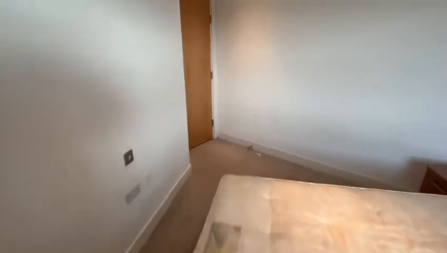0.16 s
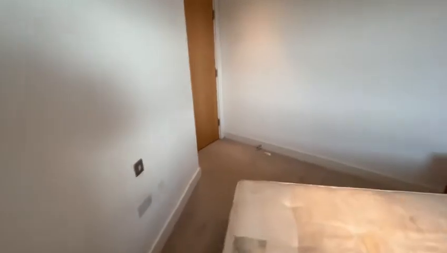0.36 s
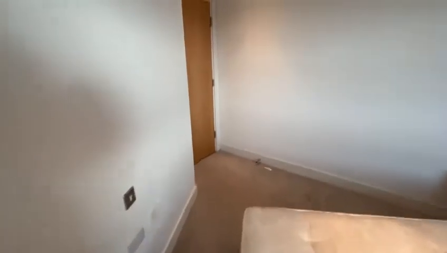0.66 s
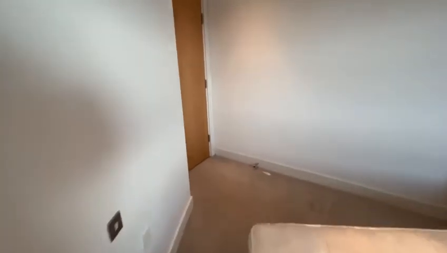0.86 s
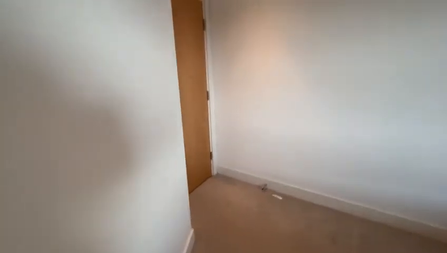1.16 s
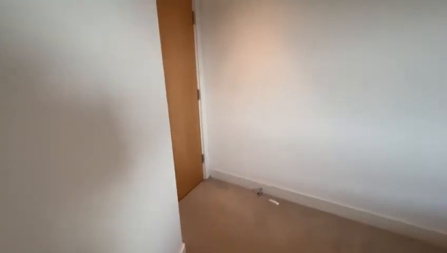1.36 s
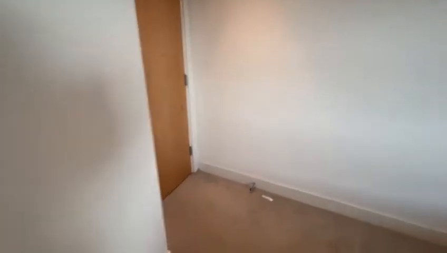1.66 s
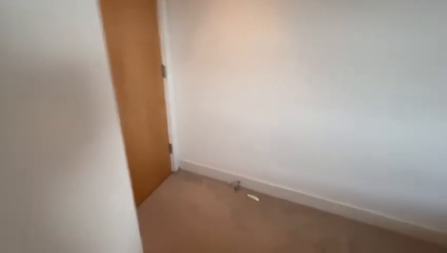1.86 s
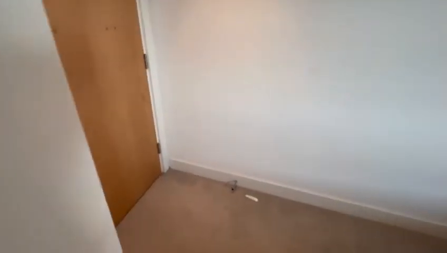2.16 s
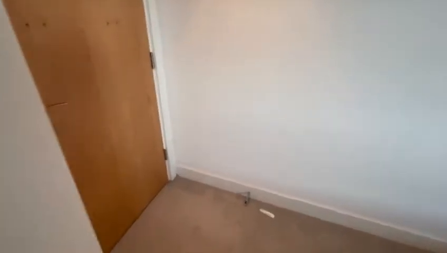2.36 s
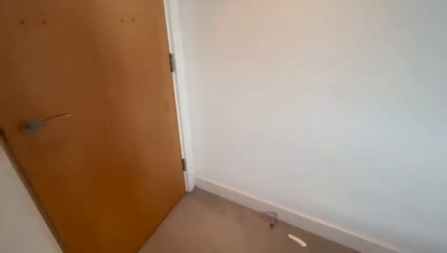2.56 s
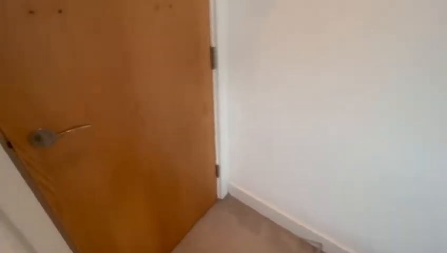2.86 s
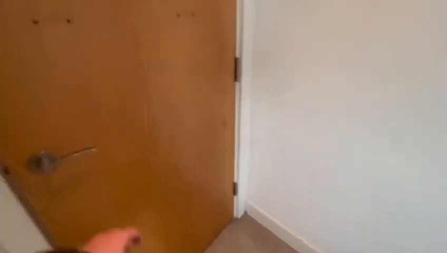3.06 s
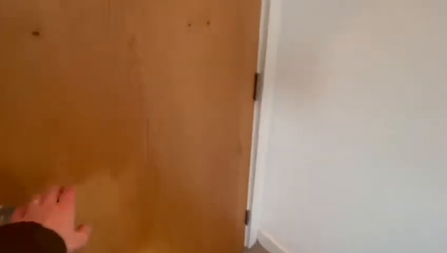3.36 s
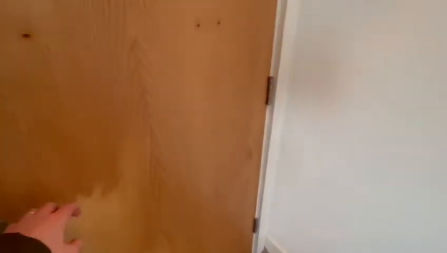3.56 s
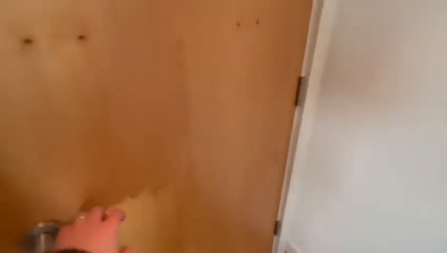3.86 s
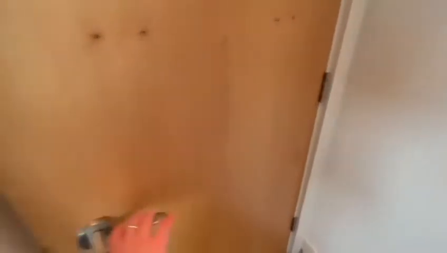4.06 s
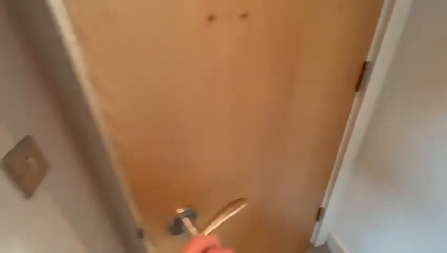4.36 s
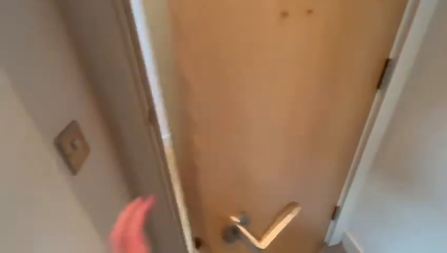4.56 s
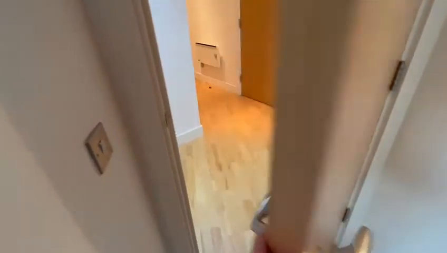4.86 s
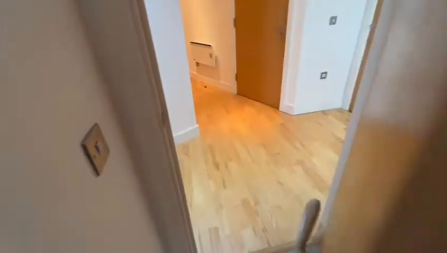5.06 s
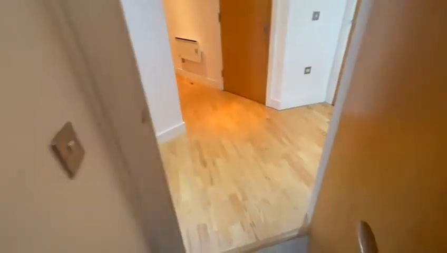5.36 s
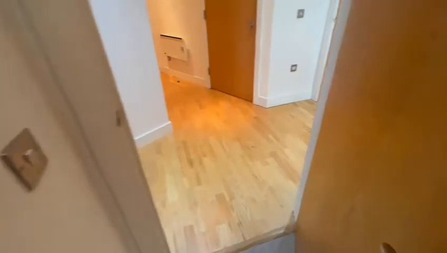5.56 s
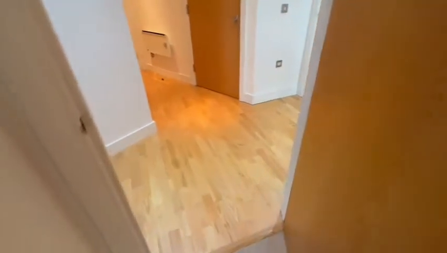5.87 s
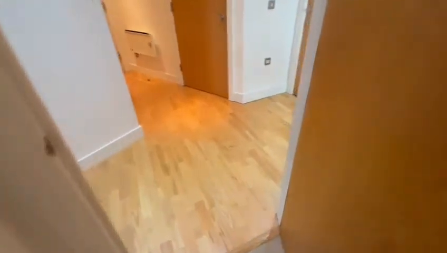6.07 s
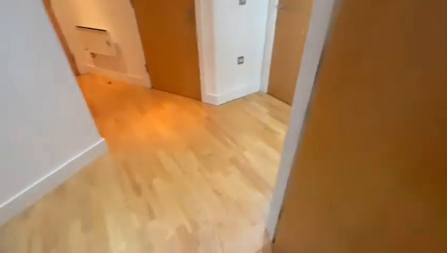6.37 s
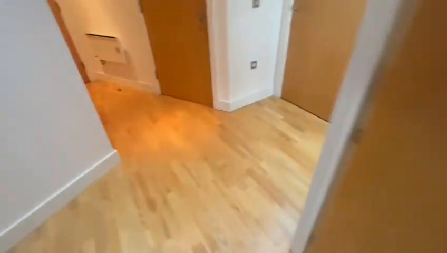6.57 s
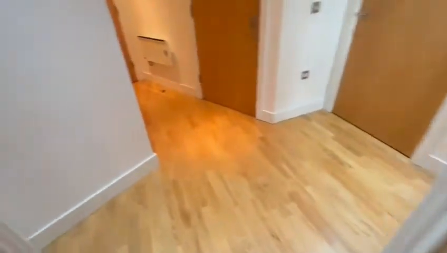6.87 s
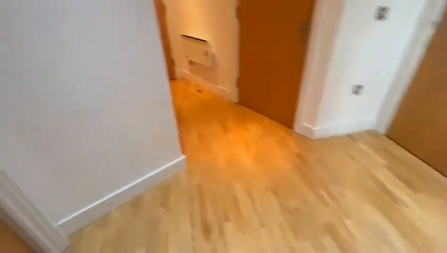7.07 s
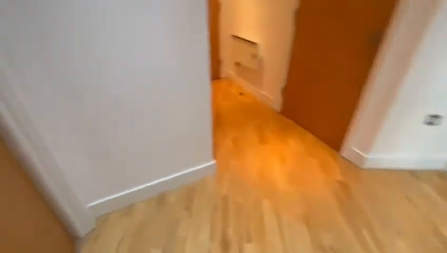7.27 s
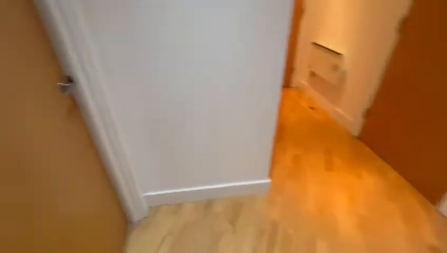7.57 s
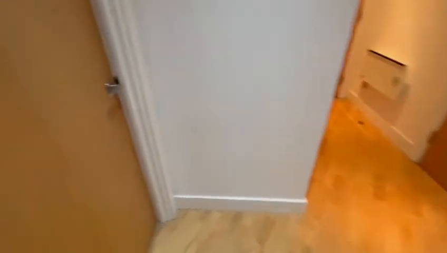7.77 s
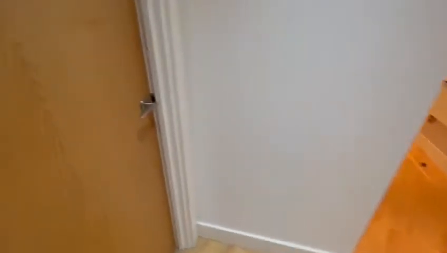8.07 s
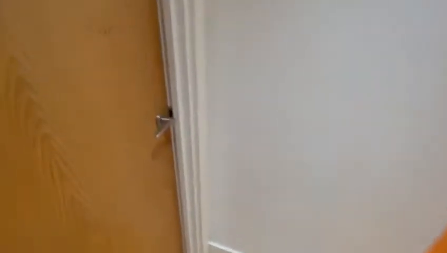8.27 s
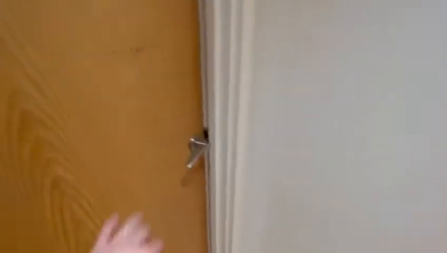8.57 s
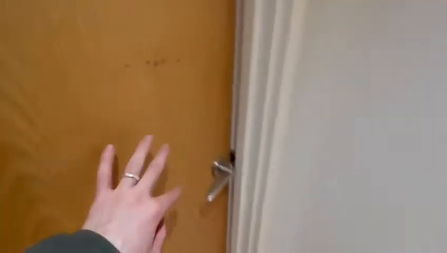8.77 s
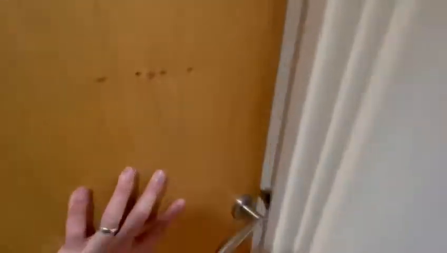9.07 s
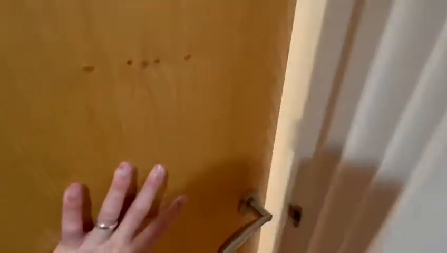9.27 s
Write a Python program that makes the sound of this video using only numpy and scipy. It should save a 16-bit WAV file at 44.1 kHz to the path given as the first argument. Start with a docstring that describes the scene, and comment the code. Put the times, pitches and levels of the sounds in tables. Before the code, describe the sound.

A hand-held mono microphone in an empty, bare-walled flat, with faint hiss and soft low bumps of fingers on its case. From 0 to 1 s, quiet carpet scuffs, small ticks and cloth rustle. At about 1.05 s a swish swells into a bright, sharp metallic click, with a low footfall. Quieter shuffles and small ticks follow, with dull wood taps near 2.6 s. At 3.1-3.5 s a brief falling squeaky rub, with handle knocks at 3.25 and 3.4 s. From 3.8 to 4.2 s a deep throb as the door pulls free, a click and tap at 4.27 s, then soft rustling. At 6.2 s a hollow wooden thud and click. Around 7.15-7.4 s a loud gritty drag on resonant parquet, another at 7.9-8.4 s. At 8.8-9.05 s knocks and crisp latch clacks, then a soft low push at 9.25 s and faint taps.

```python
"""An empty flat with bare walls: someone walks over carpet, works a lever handle, pulls a wooden door open,
steps onto a parquet hall and pushes a second door, heard by a hand-held single microphone.
Soles and clothes are coloured noise with catches, and parquet strips resonate; the floor is low noise.
Latches are noise bursts with steel modes, knocks are wood modes, the door's boom is a gliding sine.
Fingers on the case are falling chirps; a decaying noise tail gives the echo, steady noise the air."""
import sys
import numpy as np
from scipy import signal
from scipy.fft import rfft, irfft, next_fast_len
from scipy.io import wavfile
from scipy.ndimage import uniform_filter1d, map_coordinates

SR = 44100
rng = np.random.default_rng(int(sys.argv[2]) if len(sys.argv) > 2 else 0)


def inscribe(sig):
    """Save sig as 16-bit PCM at rate SR to the path in sys.argv[1].

    A 1-D sig is mono; a 2-D sig holds one channel per row.
    Samples are clipped to [-1, 1] before scaling.
    """
    pcm = np.round(np.clip(np.atleast_2d(sig).T, -1, 1) * 32767)
    wavfile.write(sys.argv[1], SR, pcm.astype(np.int16))


def boost(x):
    """Linear amplitude factor 10**(x/20) for a level x in decibels (scalar or array-like)."""
    u = np.asarray(x, float) / 20
    return 10 ** u


N = 415422

# Scuffs and drags. Each row: full contact in seconds, swell in seconds, hold in seconds,
# sole scrape level in dB, clothes swish level in dB, scrape resonance in Hz.
STROKE_ROWS = [(0.176, 0.15, 0.014, -55, -51.5, 1200), (0.308, .004, 0.057, -55.5, -56, 1140),
               (0.614, .004, 0.016, -56, -69, 1130), (0.887, .004, 0.0083, -52, -64, 1220),
               (1.05, 0.47, 0.0062, -56, -35.5, 500), (1.051, .004, 0.0027, -36.5, -31, 1390),
               (1.324, 0.12, 0.018, -61, -63, 446), (1.944, .004, 0.49, -56.5, -56, 826),
               (2.51, 0.04, 0.016, -52.5, -55.5, 1250), (2.635, 0.17, 0.017, -76, -59.5, 400),
               (3.06, .004, 0.065, -54, -50, 1200), (3.129, 0.17, 0.18, -52.5, -46.5, 1010),
               (3.692, .004, 0.022, -49, -54, 1500), (3.853, .12, 0.069, -57, -67, 424),
               (4.05, .01, 0.027, -53, -75, 500), (4.274, .003, 0.025, -50.5, -75, 900),
               (4.458, 0.12, 0.012, -56, -58, 600), (4.641, 0.27, 0.11, -55.5, -51.5, 880),
               (4.876, 0.65, 0.24, -64, -54.5, 1060), (5.887, 0.27, 0.38, -57, -52.5, 970),
               (6.192, 0.0044, 0.024, -37, -60, 624), (6.454, 0.36, 0.031, -54.5, -70, 910),
               (6.815, 0.095, 0.014, -59.5, -65, 500), (6.985, .01, 0.032, -62.5, -63, 1130),
               (7.166, 0.077, .03, -45.5, -40.5, 1160), (7.212, 0.23, 0.054, -34, -38, 1320),
               (7.266, 0.078, 0.14, -29, -35.5, 1320), (7.492, .004, 0.11, -52, -57, 1540),
               (7.923, 0.066, 0.071, -34.5, -39, 920), (8.003, 0.17, 0.1, -33.5, -45, 700),
               (8.08, .004, 0.0076, -33, -34, 855), (8.15, 0.34, 0.17, -32, -40.5, 910),
               (8.801, .004, 0.022, -43, -42, 500), (8.904, .004, 0.0053, -33.5, -52, 390),
               (9.038, .002, 0.013, -43, -41, 1240)]
# Background rustle level between strokes, rising and dipping. Each row: time in seconds,
# sole scrape level in dB, clothes swish level in dB.
RUSTLE_ROWS = [(0, -73, -68.5), (.1, -63.5, -61), (.6, -67, -62), (.86, -58.5, -55.5), (1.46, -80, -67.5),
               (1.83, -59.5, -56.5), (2.7, -64.5, -65), (3.04, -56.5, -55), (3.47, -56, -50.5),
               (3.64, -71, -77), (3.8, -63, -69), (4.12, -58, -59.5), (4.25, -65, -72), (4.44, -62.5, -57),
               (5.22, -67, -65), (5.77, -62.5, -60), (6.6, -59.5, -57), (6.7, -69, -66.5), (6.95, -91, -96),
               (7.13, -58, -52), (7.89, -58.5, -59.5), (9.27, -56.5, -62), (9.42, -70, -83)]
# Soles on carpet. Each row: frequency in Hz, relative density in dB per Hz.
SCRAPE_CARPET = [(88, -13), (150, -1), (236, -9.5), (286, -2), (324, 0), (601, -5), (4000, -17.5),
                 (5200, -25), (8800, -120)]
# Soles on parquet. Each row: frequency in Hz, relative density in dB per Hz.
SCRAPE_PARQUET = [(100, -34), (170, -14), (300, -2.5), (560, -6), (900, -7), (1590, -6), (4000, -12),
                  (5200, -12), (8800, -120)]
# Clothes near carpet. Each row: frequency in Hz, relative density in dB per Hz.
SWISH_CARPET = [(1060, -6), (1800, -4.5), (3150, -8), (4890, -8), (5420, -6.5), (9190, -13), (11100, -22.5),
                (12200, -26.5), (15800, -68)]
# Clothes over parquet. Each row: frequency in Hz, relative density in dB per Hz.
SWISH_PARQUET = [(1060, -23), (1800, -5), (2100, -5), (3490, -1.5), (5340, -6), (9110, -17), (11200, -21.5),
                 (12200, -27), (15800, -65)]
# Strips singing under the first drag. Each row: frequency in Hz, width in Hz, relative gain in dB.
FIRST_STRIPS = [(270, 21, 4.5), (398, 27, -2.5), (600, 310, -2), (686, 31, -9), (1250, 450, -5.5),
                (1550, 88, -3.5), (1880, 42, -8)]
# Strips under the next step. Each row: frequency in Hz, width in Hz, relative gain in dB.
NEXT_STRIPS = [(261, 21, -4), (303.4, 10.6, 3), (349, 8.6, -1.5), (422, 19, -0.5), (675, 20, -6.5),
               (790, 32, -8), (850, 15, -7.5), (1080, 44, -9.5), (1550, 49, -7.5)]
# A rub singing in a narrow band, with jumps to lower ones. Each row: time in seconds, pitch in Hz, level in dB.
SQUEAK_TRACK = [(3.085, 1332, -47), (3.11, 1327, -39), (3.145, 1238, -36.5), (3.2, 1151, -48.5),
                (3.3, 910, -61), (3.355, 893, -45.5), (3.385, 888, -44), (3.395, 570.4, -52),
                (3.43, 571, -46), (3.49, 561, -56)]
# Weight coming down on the floor. Each row: time in seconds, rumble level in dB, boards level in dB.
STEP_ROWS = [(.06, -77, -79), (.23, -54, -66), (.47, -53, -70), (1.08, -41, -53.5), (1.36, -53, -58),
             (1.969, -52.5, -52), (2.2, -77, -50), (2.56, -59, -60), (3.3, -55, -59), (3.53, -54, -54),
             (3.71, -49, -64), (3.86, -44, -48.5), (4.2, -46.5, -49), (4.87, -46, -59), (5.27, -56, -56),
             (5.55, -51, -85), (5.73, -53.5, -63), (6.26, -43.5, -43.5), (6.55, -56, -72),
             (7.252, -52.5, -51), (7.84, -61, -69), (8.11, -53.5, -44), (8.93, -44.5, -41),
             (9.08, -43, -64), (9.25, -46, -49), (9.36, -56, -55)]
# Floor rumble. Each row: frequency in Hz, relative density in dB per Hz.
RUMBLE_SPECTRUM = [(15, -38), (25, -5), (38, 3), (54, 20.5), (102, 13), (130, -18), (170, -59), (290, -120)]
# Floor boards. Each row: frequency in Hz, relative density in dB per Hz.
BOARDS_SPECTRUM = [(59, -61), (100, -3), (155, 1), (221, -1), (350, -11.5), (460, -13.5), (770, -120)]
# Sharp contacts. Each row: start in seconds, peak level in dB, centre in Hz, burst t60 in seconds,
# relative width as a share of the centre.
CLICK_ROWS = [(0.199, -34, 1330, 0.057, 1.7), (.321, -35.5, 1150, 0.073, 1.3),
              (0.62, -41, 1490, 0.11, 0.64), (0.885, -29, 2900, 0.17, 0.71), (0.969, -35, 1410, 0.05, 0.84),
              (1.054, -20, 4600, 0.25, 0.19), (1.403, -47, 1900, 0.033, 0.43),
              (1.555, -37.5, 6700, 0.031, 0.8), (1.957, -36, 1310, 0.19, 0.95),
              (2.253, -40, 795, 0.01, 0.28), (2.725, -42.5, 2020, 0.012, 0.25),
              (3.017, -34, 624, 0.02, 0.66), (3.229, -28.5, 830, 0.027, 0.71),
              (3.257, -33.5, 446, 0.031, 0.45), (3.395, -38, 690, 0.044, 0.46),
              (3.673, -40.5, 1590, 0.055, 0.28), (3.702, -39, 1410, 0.13, 0.44),
              (4.273, -38, 1170, 0.1, 0.29), (6.193, -26, 1310, 0.11, 0.38),
              (6.371, -35, 1630, 0.012, 0.23), (6.467, -34.5, 2640, 0.043, 0.12),
              (6.486, -34, 1060, 0.02, 0.52), (7.257, -26, 1600, 0.047, 1.5),
              (8.081, -27, 4930, 0.034, 0.39), (8.8, -25.5, 4840, 0.011, 0.48),
              (8.801, -40, 1300, 0.1, 0.53), (8.886, -37, 1390, 0.038, 0.24),
              (8.905, -35, 2270, 0.069, 0.34), (9.041, -23.5, 2490, 0.067, 0.67),
              (9.042, -25.5, 1220, 0.11, 0.35), (9.044, -33, 756, 0.072, 0.16)]
# Latch and handle modes. Each row: frequency in Hz, relative level in dB, unstretched t60 in seconds.
STEEL_MODES = [(1274, 18.5, 0.025), (1780, 9, 0.033), (3060, 9, 0.049), (4260, 24.5, 0.022)]
# Dull blows on wood. Each row: start in seconds, peak level in dB, most excited pitch in Hz, t60 stretch (ratio).
KNOCK_ROWS = [(1.028, -45, 200, 2.4), (1.327, -40, 215, 1.1), (1.351, -44, 199.8, 0.54),
              (2.602, -44, 292, 0.55), (2.609, -34.5, 325, 0.47), (2.626, -43, 290, .5),
              (2.661, -44, 295, 0.36), (3.256, -33, 328, 0.38), (3.396, -33.5, 500, 0.62),
              (3.816, -42.5, 320, 2.6), (4.273, -38.5, 400, 0.59), (4.279, -34.5, 855, 0.68),
              (4.829, -44.5, 160, 2.2), (6.196, -29, 330, 2), (6.201, -25.5, 580, 2.6),
              (6.203, -26.5, 150, 2.7), (6.459, -39.5, 200, 1.4), (7.152, -36, 250, 0.86),
              (7.204, -30.5, 335, 0.8), (8.074, -40, 364, 1.8), (8.784, -28.5, 343, 0.7),
              (8.907, -22.5, 342, 0.78), (9.288, -46, 405, 1.7), (9.345, -42.5, 383, 1.4)]
# Door leaf and board modes. Each row: frequency in Hz, relative level in dB, unstretched t60 in seconds.
WOOD_MODES = [(160, -1, 0.13), (215, -4.5, 0.15), (261.5, -6, 0.15), (300, 4.5, 0.03), (365, 0.5, 0.078),
              (500, -3.5, 0.14), (600, -4, 0.078), (828, -4, 0.081), (1085, -13, 0.18)]
# Soft low pushes. Each row: start in seconds, envelope peak in dB.
PUSH_ROWS = [(4.202, -41), (9.247, -31)]
# The leaf swings free of its frame. Each row: time in seconds, pitch in Hz, rms level in dB.
BOOM_TRACK = [(3.78, 48, -52), (3.82, 47.3, -41), (3.89, 46, -38), (3.93, 48.4, -43), (3.99, 47.7, -35),
              (4.07, 46.5, -45), (4.11, 48, -56), (4.145, 50.5, -41), (4.185, 46, -63), (4.3, 43.7, -80)]
# Fingers shifting on the case. Each row: start in seconds, peak level in dB, starting pitch in Hz.
POP_ROWS = [(0.263, -45.5, 700), (0.465, -45, 880), (1.621, -49.5, 1500), (1.724, -45, 1740),
            (1.904, -43.5, 1490), (1.936, -44, 1500), (2.251, -47, 1510), (2.684, -47, 1490),
            (2.713, -49, 1490), (2.924, -48, 1500), (3.09, -50, 900), (3.227, -37, 1720), (3.255, -41, 900),
            (3.924, -45, 1200), (4.05, -38, 600), (4.511, -42, 1520), (5.114, -49, 1500),
            (5.156, -48.5, 1500), (6.456, -39.5, 1300), (6.591, -42, 1490), (9.075, -32, 1480)]
# Echo decay. Each row: frequency in Hz, t60 in seconds.
WALL_DECAY = [(100, 0.15), (500, 0.25), (2000, 0.58), (10000, 0.065)]
# Still room and microphone hiss. Each row: frequency in Hz, relative density in dB per Hz.
AIR_SPECTRUM = [(18, -52), (30, 0.5), (69, 15), (146, -35), (611, -18), (1150, -2.5), (2430, -14.5),
                (5720, -12.5), (9220, -21), (11300, -23), (12200, -48.5), (15800, -59)]

HALL_S, NEXT_STEP_S = 7.05, 7.8  # carpet to parquet; first to next strips
SWELL_DB, FADE_DB_PER_S, SAG_OCTAVES_PER_S = 88, 140.5, 0.73  # SWELL_DB also serves the steps
RUSTLE_HZ, RUSTLE_OCTAVES = 910, 0.1  # resonance between strokes and its wander
JUDDER_PER_S, JUDDER_DB, STRIPS_DB = 23, 2.5, 8  # grip and slip of the sole; boost of the strips
LOAD_S, SETTLE_DB_PER_S, REST_DB = 0.59, 66, -69  # rumble: swell, fall, level between steps
SHIFT_S, EASE_DB_PER_S, STILL_DB = 0.69, 47.5, -70.5  # boards: the same
POP_TO_HZ, POP_DROP_S, POP_T60_S = 107.4, 0.00164, 0.07
FAINT_POPS, FAINT_DB, FAINT_SPREAD_DB, FAINT_FROM_HZ = 110, -55.5, 3.5, 480  # many soft, duller pops
AIR_DB = -62.5
TOP_HZ = 11760


def walker():
    """Soles drag over the floor and sleeves rub, as noise with catches; steps shake the floor."""
    scrape_gain, peak_hz, swish_gain = moves()
    pressure = surges(60, depth_db=0.5)
    scrape = by_floor(grit(990, spread_db=1.0, share=0.39), SCRAPE_CARPET, SCRAPE_PARQUET)
    scrape = patchy(singing(scrape), 2.1, peak_hz, peak_db=5.5, octaves=0.85)
    swish = by_floor(grit(1800, spread_db=-3.0, share=0.13), SWISH_CARPET, SWISH_PARQUET)
    swish = patchy(swish, patchy_db=3.0)
    rubbing = pressure * (scrape_gain * scrape + swish_gain * swish)
    return rubbing + squeak(), tread()


def moves():
    """Scrape gain, its resonance (led by the loudest stroke) and swish gain."""
    s, swell_s, hold_s, scrape_db, swish_db, hz = np.transpose(STROKE_ROWS)
    shape, age = swells(s, swell_s, hold_s, FADE_DB_PER_S)
    rustle_scrape, rustle_swish = (boost(2 * c) for c in curves(RUSTLE_ROWS))
    scrape_power = summed(shape, scrape_db) + rustle_scrape
    swish_power = summed(shape, swish_db) + rustle_swish
    octave = np.log2(np.c_[hz]) - SAG_OCTAVES_PER_S * np.minimum(age, .5)
    wander = np.log2(RUSTLE_HZ) + RUSTLE_OCTAVES * slow(5.5)
    # power-weighted mean pitch; summed() squares the root
    led = summed(shape * np.sqrt(octave), scrape_db) + rustle_scrape * wander
    return np.sqrt(scrape_power), 2 ** (led / scrape_power), np.sqrt(swish_power)


def by_floor(x, carpet, parquet):
    """The floor colours the noise: carpet first, then parquet in the hall."""
    return np.where(np.arange(N) < HALL_S * SR, coloured(x, carpet), coloured(x, parquet))


def singing(x):
    """In the hall parquet strips resonate with the drag, in bursts as the sole grips and lets go."""
    t = np.arange(N) / SR
    grip = np.sin(2 * np.pi * np.cumsum(JUDDER_PER_S * (1 + .5 * slow(10))) / SR)
    gripped = rfft(x * unit(boost(JUDDER_DB * grip)))
    first = unit(x + boost(STRIPS_DB) * irfft(gripped * strip_response(FIRST_STRIPS), N))
    second = unit(x + boost(STRIPS_DB) * irfft(gripped * strip_response(NEXT_STRIPS), N))
    return np.where(t < HALL_S, x, np.where(t < NEXT_STEP_S, first, second))


def strip_response(strips):
    """Parallel second-order resonances, one for each strip."""
    f = np.fft.rfftfreq(N, 1 / SR)
    return sum(boost(db) * 1j * f * width_hz / (hz * hz - f * f + 1j * f * width_hz)
               for hz, width_hz, db in strips)


def squeak():
    """Stick and slip locks loosely to one pitch: a tone whose size and phase wander fast."""
    hz, db = curves(SQUEAK_TRACK)
    t = np.arange(N) / SR
    wander = uniform_filter1d(rng.standard_normal((2, N)), size=260, axis=1)
    phase = 2 * np.pi * np.cumsum(hz) / SR
    sounding = (t > SQUEAK_TRACK[0][0]) & (t < SQUEAK_TRACK[-1][0])
    return boost(db) * sounding * unit(wander[0] * np.cos(phase) + wander[1] * np.sin(phase))


def tread():
    """Each step swells the floor's rumble and, more slowly, shifts the boards."""
    s, rumble_db, boards_db = np.transpose(STEP_ROWS)
    rumble_shape, _ = swells(s, [LOAD_S], [0], SETTLE_DB_PER_S)
    boards_shape, _ = swells(s, [SHIFT_S], [0], EASE_DB_PER_S)
    rumble_power = summed(rumble_shape, rumble_db) + boost(2 * REST_DB)
    boards_power = summed(boards_shape, boards_db) + boost(2 * STILL_DB)
    rumble = coloured(rng.standard_normal(N), RUMBLE_SPECTRUM)
    boards = surges(12, depth_db=6.0) * coloured(grit(90, spread_db=4.5, share=0.29), BOARDS_SPECTRUM)
    return np.sqrt(rumble_power) * rumble + np.sqrt(boards_power) * boards


def clicks():
    """A burst of noise and a ring of latch steel, both heard round the contact's own pitch."""
    out, t = np.zeros(N + SR), np.arange(SR // 4) / SR
    for s, db, hz, t60_s, width in CLICK_ROWS:
        burst = rng.standard_normal(len(t)) * boost(-60 * t / t60_s)
        steel = .7 * ring(STEEL_MODES, t, stretch=t60_s / .11, scatter_db=5)
        out[round(s * SR):][:len(t)] += boost(db) * band(burst + steel, hz, 1.66 * width)
    return out[:N]


def knocks():
    """Dull blows ring the modes of the wood, most strongly near each blow's pitch."""
    out, t = np.zeros(N + SR), np.arange(SR // 2) / SR
    for s, db, hz, stretch in KNOCK_ROWS:
        wood = ring(WOOD_MODES, t, stretch, scatter_db=4.0)
        out[round(s * SR):][:len(t)] += boost(db) * band(wood, hz, width=0.71)
    return out[:N]


def pushes():
    """A soft push gives one or two slow swings of air: a 58 Hz sine under a short swell."""
    out, t = np.zeros(N + SR), np.arange(SR // 2) / SR
    u = t / 0.0084  # envelope peaks at 8.4 ms
    swing = np.sin(2 * np.pi * 58 * t) * u * np.exp(1 - u)
    for s, db in PUSH_ROWS:
        out[round(s * SR):][:len(t)] += boost(db) * swing
    return out[:N]


def boom():
    """The lowest mode of the leaf and the air of the room throbs while the door is pulled."""
    hz, db = curves(BOOM_TRACK)
    t = np.arange(N) / SR
    sounding = np.clip(np.minimum(t - BOOM_TRACK[0][0], BOOM_TRACK[-1][0] - t) / 0.026, 0, 1)
    return np.sqrt(2) * boost(db) * sounding * np.sin(2 * np.pi * np.cumsum(hz) / SR)


def pops():
    """Fingers shift on the case: short swings that start high and fall at once."""
    draw = rng.random((FAINT_POPS, 2))
    faint_s = draw[:, 0] * N / SR
    faint_db = FAINT_DB - FAINT_SPREAD_DB * np.log(draw[:, 1] + .2)
    faint = np.c_[faint_s, faint_db, np.full(len(draw), FAINT_FROM_HZ)]
    out, t = np.zeros(N + SR), np.arange(SR // 10) / SR
    for s, db, from_hz in [*POP_ROWS, *faint]:
        hz = POP_TO_HZ + (from_hz - POP_TO_HZ) * np.exp(-t / POP_DROP_S)
        swing = np.sin(2 * np.pi * np.cumsum(hz) / SR)
        out[round(s * SR):][:len(t)] += swing * boost(db - 60 * t / POP_T60_S)
    return out[:N]


def walls(x):
    """Each frequency of the room's answer dies at its own speed."""
    hz, t, z = signal.stft(rng.standard_normal(SR // 2), SR, nperseg=256)
    decay = boost(-60 * t / along(WALL_DECAY, hz)[:, None])
    tail = signal.istft(z * decay, SR, nperseg=256)[1]
    delayed = np.pad(x, (200, 0))  # samples
    return signal.fftconvolve(delayed, tail / np.linalg.norm(tail))[:N]


def air():
    """Still room and microphone hiss: coloured noise, patchy in time and pitch."""
    return boost(AIR_DB) * patchy(coloured(rng.standard_normal(N), AIR_SPECTRUM), patchy_db=3.0)


def unit(x):
    """Scaled to rms 1."""
    return x / np.sqrt(np.mean(x ** 2) + 1e-20)


def along(points, hz):
    """(Hz, value) points on a log axis."""
    f, v = np.transpose(points)
    return np.interp(np.log(hz + 1), np.log(f + 1), v)


def curves(rows):
    """One value per sample for each column after the time."""
    s, *cols = np.transpose(rows)
    return [np.interp(np.arange(N) / SR, s, c) for c in cols]


def coloured(x, spectrum):
    """x through a (Hz, dB) spectrum, brought to rms 1."""
    m = next_fast_len(N + 8192)
    gain = boost(along(spectrum, np.fft.rfftfreq(m, 1 / SR)))
    return unit(irfft(rfft(x, m) * gain, m)[:N])


def grit(rate_per_s, spread_db, share):
    """Noise plus random catches of unequal, bounded size; share is the catches' part of the power."""
    draw = rng.random((3, N))
    size = boost(-spread_db * np.log(draw[2] + 0.03))
    catches = (draw[0] < rate_per_s / SR) * np.sign(draw[1] - .5) * size
    return np.sqrt(share) * unit(catches) + np.sqrt(1 - share) * rng.standard_normal(N)


def patchy(x, patchy_db, peak_hz=None, peak_db=0, octaves=1):
    """Random patches of gain over time and pitch, and an optional moving broad resonance; rms 1."""
    hz, t, z = signal.stft(x, SR, nperseg=512)
    field = uniform_filter1d(rng.standard_normal(z.shape), size=3, axis=0)
    field = uniform_filter1d(field, size=8, axis=1)
    gain = boost(patchy_db * unit(field))
    if peak_hz is not None:
        centre = np.interp(t, np.arange(N) / SR, peak_hz)
        distance = np.log2((hz[:, None] + 1) / centre) / octaves
        hump = boost(peak_db * np.exp(-distance ** 2))
        power = np.mean(abs(z) ** 2, axis=1)[:, None]
        # offset the hump's effect on level
        gain *= hump * np.sqrt(power.sum() / (power * hump ** 2).sum(axis=0))
    return unit(signal.istft(z * gain, SR, nperseg=512)[1][:N])


def ring(modes, t, stretch, scatter_db):
    """A set of dying modes, struck at random strengths; peak 1."""
    draw = rng.standard_normal(len(modes))
    x = sum(boost(db + scatter_db * d - 60 * t / (t60_s * stretch)) * np.sin(2 * np.pi * hz * t)
            for (hz, db, t60_s), d in zip(modes, draw))
    return x / abs(x).max()


def band(x, hz, width):
    """Two like resonances in a row; peak 1."""
    f = np.fft.rfftfreq(len(x), 1 / SR)
    one = 1j * f * hz * width / (hz * hz - f * f + 1j * f * hz * width)
    x = irfft(rfft(x) * one ** 2, len(x))
    return x / abs(x).max()


def swells(s, swell_s, hold_s, fade_db_per_s):
    """One gain row per event on a millisecond grid: swell, hold, fade; also the age of each."""
    age = np.arange(0, N / SR + .01, .001) - np.c_[s]
    swell_db = SWELL_DB * np.minimum(age, 0) / np.c_[swell_s]
    fade_db = fade_db_per_s * np.maximum(age - np.c_[hold_s], 0)
    return boost(np.maximum(swell_db - fade_db, -150)), np.maximum(age, 0)


def summed(shape, db):
    """Powers of all events added, one value per sample."""
    power = (shape ** 2 * boost(2 * np.c_[db])).sum(axis=0)
    return np.interp(np.arange(N) / SR, np.arange(len(power)) / 1000, power)


def surges(rate_per_s, depth_db):
    """Uneven pressure: a quick random gain of mean power 1."""
    return unit(boost(depth_db * slow(rate_per_s)))


def slow(rate_per_s):
    """A smooth random curve through rate_per_s knots a second."""
    knots = rng.standard_normal(int(N * rate_per_s / SR) + 4)
    return map_coordinates(knots, [np.arange(N) * rate_per_s / SR])


def scene():
    """All sources in one bare room, the same on both channels."""
    rubbing, floor = walker()
    hard = clicks()
    dull = knocks() + pushes()
    echo = walls(boost(-9) * hard + boost(-7) * dull + boost(-13) * rubbing)
    mix = rubbing + floor + hard + dull + boom() + pops() + echo + air()
    return np.tile(mix, (2, 1))


def low_pass(x):
    """Removes everything above the highest recorded frequency."""
    return signal.sosfilt(signal.butter(12, 11900, fs=SR, output="sos"), x)


def record(dry):
    """The microphone falls away at the very top: a sixth-order low-pass."""
    top = signal.butter(6, TOP_HZ, fs=SR, output="sos")
    mix = signal.sosfilt(top, dry)
    return low_pass(mix)


dry = scene()
out = record(dry)
inscribe(out)
```